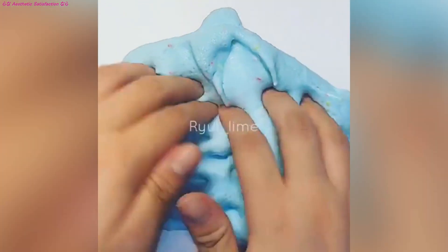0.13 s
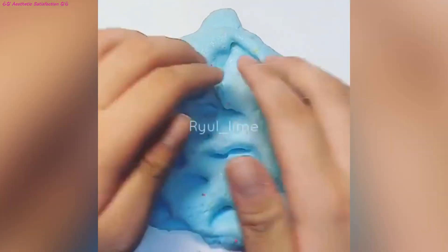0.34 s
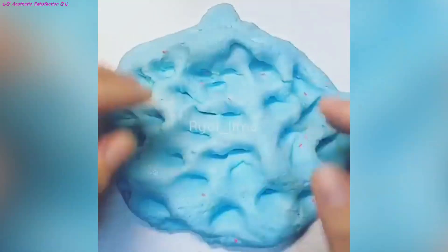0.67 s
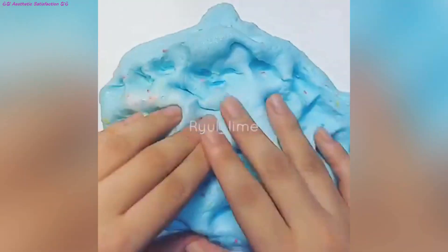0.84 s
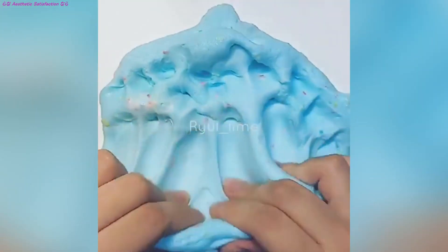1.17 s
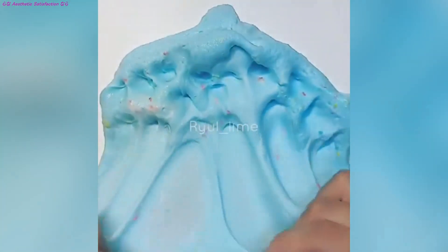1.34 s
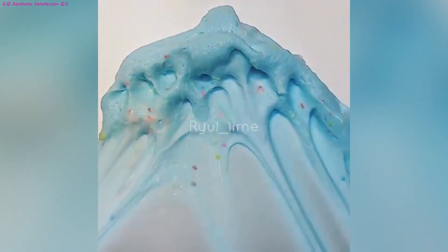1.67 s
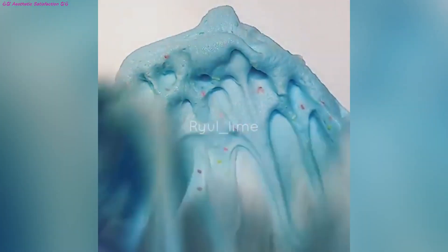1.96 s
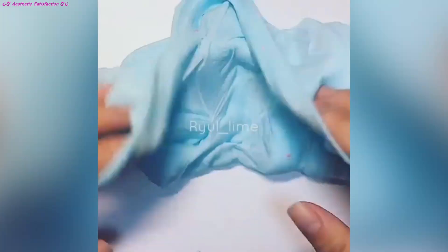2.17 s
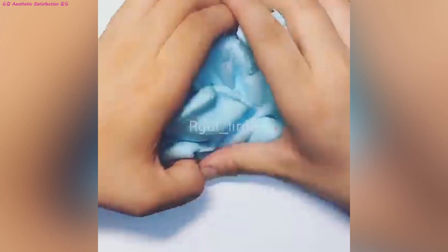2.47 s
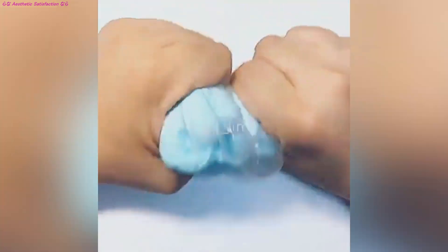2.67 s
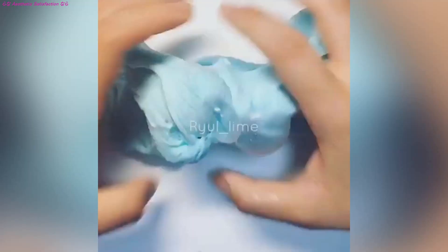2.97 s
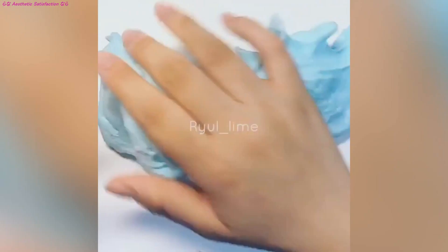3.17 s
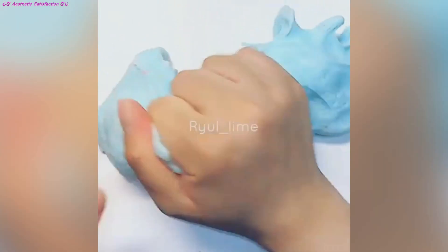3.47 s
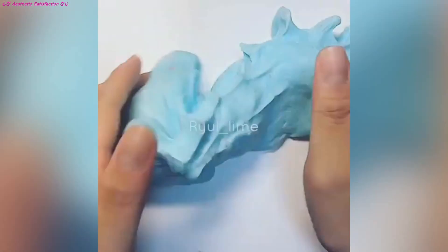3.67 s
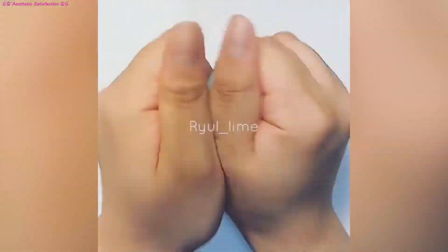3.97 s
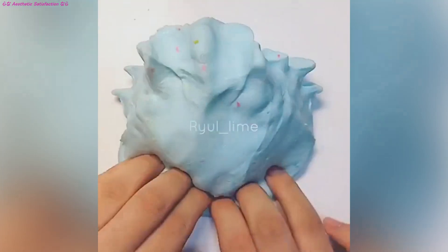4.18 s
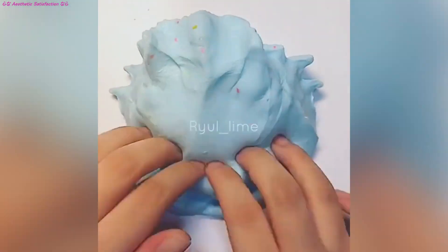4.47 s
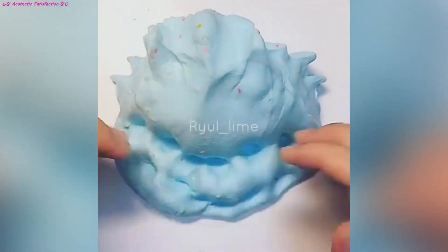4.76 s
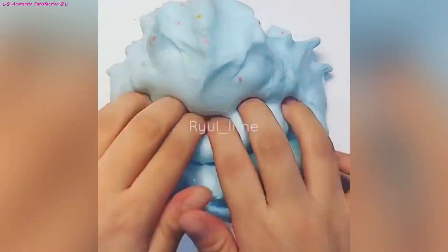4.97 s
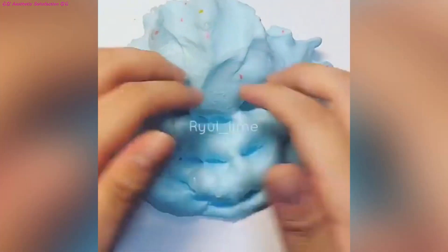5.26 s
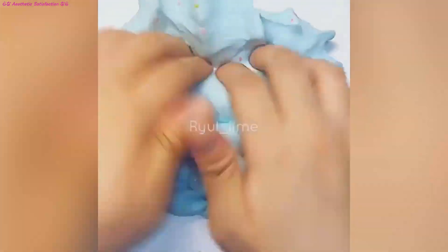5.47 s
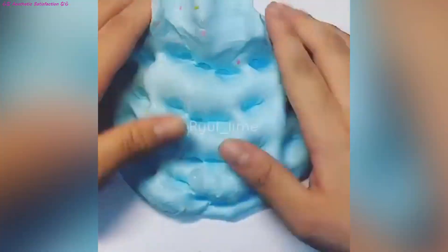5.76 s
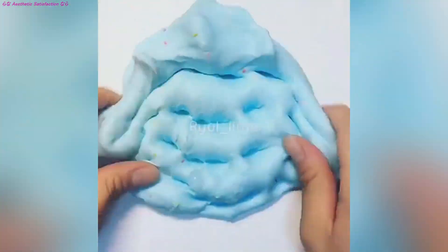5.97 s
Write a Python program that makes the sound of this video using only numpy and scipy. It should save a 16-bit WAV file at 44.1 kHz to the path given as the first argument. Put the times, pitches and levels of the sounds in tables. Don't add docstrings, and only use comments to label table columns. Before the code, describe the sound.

Hands knead thick slime up close: sharp wet pops, sticky crackling peels, a taut stretch, then dense squeezing bursts and soft table thumps.

```python
import sys
import numpy as np
from scipy import signal
from scipy.fft import rfft, irfft, next_fast_len
from scipy.io import wavfile
from scipy.ndimage import uniform_filter1d

SR = 44100
rng = np.random.default_rng(int(sys.argv[2]) if len(sys.argv) > 2 else 0)


def store_pcm(level_fs):
    pcm = np.round(np.clip(level_fs, -1, 1) * 32767).astype(np.int16)
    wavfile.write(sys.argv[1], SR, np.atleast_2d(pcm).T)


def level_to_linear(level):
    exponent = np.asarray(level, float) / 20
    return 10 ** exponent


N = 269451


def band(x, lo_hz, hi_hz, order=2):
    return signal.sosfilt(signal.butter(order, [lo_hz, hi_hz], "band", fs=SR, output="sos"), x)


def unit(x):
    return x / np.sqrt(np.mean(x ** 2))


def peaked(x):
    return x / np.abs(x).max(axis=-1, keepdims=True)


def walk(rate):
    k = int(SR / rate)
    held = np.repeat(rng.standard_normal(N // k + 1), k)
    return 1.3 * uniform_filter1d(uniform_filter1d(held, k), k)[:N]


def add(out, s, x):
    i = max(int(s * SR), 0)
    out[i:i + len(x)] += x[:N - i]


def room():
    # pitch_hz, level_db (per Hz)
    spectrum = np.array([(26, -33.5), (45, -2.5), (87, -7.5), (174, -10), (277, -11.5), (539, -18.5),
                         (609, -27), (948, -35), (1070, -29), (13500, -37), (16000, -55)])
    hz = np.maximum(np.fft.rfftfreq(N, 1 / SR), 1)
    colour = level_to_linear(np.interp(np.log(hz), np.log(spectrum[:, 0]), spectrum[:, 1]))
    noise = unit(irfft(rfft(rng.standard_normal(N)) * colour, N))
    return noise * level_to_linear(-66.5 - 6.5 + 0.32 * walk(2.4))


def strokes(wet):
    # peak_s, crackle_db, rise_ms and fall_ms (per 20 dB), wet_db (re crackle)
    touches = [(0.181, -67.5, 184, 137, -7.5), (0.528, -73, 8, 300, -9), (0.58, -67.5, 82, 122, -5),
               (1.023, -70, 125, 900, -5.5), (1.16, -70.5, 68, 502, -10), (1.357, -59.5, 132, 205, -6),
               (1.539, -60.5, 97, 66, -8), (1.62, -79.5, 100.5, 480, 1), (4.26, -75, 25, 302, -4),
               (4.65, -74.5, 122, 502, -5.5), (5.02, -76.5, 38, 1999.5, -5.5), (5.56, -74, 296, 900, 1),
               (5.795, -66, 18, 53, -6), (6.047, -58, 127, 202, -0.5)]
    # peak_s, crackle_db, rise_ms and fall_ms (per 20 dB), wet_db (re crackle)
    kneads = [(2.149, -68.5, 130, 298, 1), (2.27, -57, 201, 51, -4.5), (2.496, -68, 600, 100, -19),
              (2.595, -55.5, 125, 238, -3), (2.7, -55.5, 95, 200, -8), (2.768, -55.5, 57, 134, -21),
              (2.884, -55, 62.5, 107, 5), (2.984, -58, 32, 63, -24), (3.086, -46, 70.5, 76, -3),
              (3.147, -55, 123, 11, -10), (3.385, -64, 128, 62, -4), (3.444, -50, 35, 148, -12),
              (3.57, -49.5, 10, 39, -10), (3.644, -54, 31, 102, -3.5), (3.7, -49.5, 145, 13, -5.5),
              (3.986, -59, 350, 148, -6), (4.131, -60.5, 240, 92, -14), (4.21, -53.5, 200, 11, -3.5)]
    # let_go_s, loudest_s, crackle_db, wet_db (re crackle), fall_ms (per 20 dB)
    pulls = [
        (0.31, 0.363, -54, 5.5, 63),
        (0.704, 0.751, -53.5, 2, 50),
        (4.403, 4.436, -49, 1, 44),
        (4.821, 4.859, -49.5, 1, 42.5),
        (5.247, 5.305, -51, 0.5, 31.5),
        (5.65, 5.695, -54, 6.5, 74),
    ]
    t = np.arange(N) / SR
    power = level_to_linear(2 * -87)
    for s, db, rise_ms, fall_ms, wet_db in touches + kneads:
        distance = np.maximum((s - t) / rise_ms, (t - s) / fall_ms) * 1000
        power = power + level_to_linear(2 * (db + wet * wet_db - 20 * distance))
    let_go_ms = 6.8
    drip_db, drip_slower = -23, 1.7
    for go_s, s, db, wet_db, fall_ms in pulls:
        start_db = -8 + wet * -8
        rise = np.interp(t, [go_s - let_go_ms / 250, go_s, s], [start_db - 80, start_db, 0])
        after = np.maximum(t - s, 0) * 1000 / fall_ms
        fade = after / 1.19 if wet else after ** 1.27
        level_db = db + wet * wet_db + rise
        power = power + level_to_linear(2 * (level_db - 20 * fade))
        power = power + level_to_linear(2 * (level_db + drip_db - 20 * after / drip_slower))
    return 10 * np.log10(power)


def ticks(count=130):
    draw = np.clip(rng.standard_normal((count, 4)), -1.5, 1.5)
    s = rng.uniform(0, N / SR, count)
    db = strokes(0)[(s * SR).astype(int)] + 6 + 4.5 * draw[:, 0]
    hz = 2340 * np.exp(.5 * draw[:, 1])
    return np.transpose([s, db, hz, -10 + 5 * draw[:, 2], -8.5 + 5 * draw[:, 3]])


def pops():
    # start_s, peak_db, pitch_hz, body_db (re peak), snap_db (re peak)
    poke_pops = [(0.103, -66.5, 3000, -6, 14), (0.178, -64, 7050, -8, 18), (0.215, -62.5, 3000, -12, 13),
                 (0.269, -68, 8000, -8, 18), (0.2541, -62.5, 7850, -13, 12.5),
                 (0.3122, -41, 1720, -6, 10.5), (0.337, -26.5, 820, 1.5, -1.5), (0.357, -28.5, 653, 3, 8.5),
                 (0.3578, -23.5, 2070, -8, -17), (0.3616, -42, 557, 12, -1),
                 (0.7084, -38.5, 2170, -11, 6.5), (0.7246, -26.5, 4670, -6.5, 1),
                 (0.727, -36.5, 975, 6, -22), (0.744, -60, 8000, -10, 13), (0.7622, -45.5, 1010, 16, 11),
                 (0.961, -69, 7000, -9, 10), (1.0073, -62, 500, 8, 5), (1.0365, -50, 2820, -21, 6.5),
                 (1.1212, -39, 6040, -13, 9), (1.1459, -48, 2970, -1, 5), (1.1678, -48, 1960, -9, -17),
                 (1.3551, -43, 1650, -19, -10), (1.537, -47, 1880, -16, -19)]
    fold_pops = [(2.2255, -36.5, 1493, 1.5, -3), (2.2622, -28, 4160, -16, -2.5),
                 (2.4076, -55, 1330, 6.5, 6.5), (2.469, -47, 4100, -6, -1), (2.5174, -46.5, 430, 11, -12),
                 (2.5765, -19, 1900, -9.5, -26), (2.5882, -36, 1890, -26, -13),
                 (2.7537, -24, 3070, -13, -26.5), (2.772, -40.5, 1450, 7.5, 8),
                 (2.7911, -42, 1290, -4, 11.5), (2.8233, -36, 1520, 0.5, -7),
                 (2.8422, -31.5, 1460, -2, -7.5), (2.8669, -11, 2595, -5, -15),
                 (2.8658, -30, 2700, -3.5, 3), (2.894, -39, 950, -7, -13), (2.9241, -37, 756, -2, 3),
                 (2.9734, -29.5, 7400, -7, 13), (2.9895, -58, 8000, -10, 24), (3.0553, -36, 2090, 0.5, -7),
                 (3.17, -60.5, 664, 10, -12)]
    fist_pops = [(3.3877, -42.5, 1370, -5, 5), (3.4184, -40, 1340, 7, -23.5),
                 (3.4244, -23.5, 1120, -5, 1.5), (3.443, -30.5, 8700, -16, 8),
                 (3.447, -23.5, 1290, -5.5, -18), (3.4511, -21, 2830, -14, -0.5),
                 (3.4807, -40, 1580, -13, -18), (3.5019, -26, 2100, -4.5, -0.5),
                 (3.506, -23.5, 870, -9, 4.5), (3.5318, -43, 4780, -5, 3), (3.5561, -24, 4430, -11.5, 4),
                 (3.567, -37, 2540, -24, 11.5), (3.572, -36, 2110, -20, 4), (3.642, -36.5, 2000, 0, -17),
                 (3.735, -42, 1155, 1, -6)]
    palm_pops = [(3.9362, -38.5, 5830, -16, 10), (3.9437, -38, 950, -3.5, -11),
                 (3.9848, -40, 2910, -21, -1.5), (3.9932, -41, 2030, -9.5, 5.5),
                 (4.015, -36, 1880, -19, -1), (4.0353, -46.5, 3380, -24, -12), (4.0453, -41, 3920, -19, 5),
                 (4.05, -29, 2090, -28, -22), (4.0566, -36.5, 2630, -28, 1.5),
                 (4.083, -41.5, 8600, -17, 14.5), (4.108, -43, 3380, -22, 5.5),
                 (4.1251, -41, 2050, -12, -2), (4.1347, -38, 1640, -13.5, 12.5),
                 (4.1556, -41.5, 10000, 0, 17), (4.1699, -17, 2900, -16, 4), (4.1706, -26, 3200, -16, -22),
                 (4.188, -50.5, 8500, -7.5, 18), (4.1968, -53, 1200, -5.5, 16.5),
                 (4.2084, -43.5, 4360, -16, 1.5)]
    late_pops = [(4.3089, -57, 2000, -5, 5), (4.3935, -61, 8370, -6, 15), (4.402, -47, 7600, 0, 9),
                 (4.4254, -33.5, 2424, -4, 11), (4.632, -58.5, 5050, -2, 7), (4.6611, -50, 2060, -21, -6),
                 (4.7056, -44, 2970, -10, -3.5), (4.8203, -41.5, 7300, -7, 11.5),
                 (4.8458, -37, 2640, -2, -12), (4.8514, -37.5, 1310, 1, 5.5), (5.02, -57, 1527, 2.5, 0),
                 (5.044, -51.5, 2840, -2, -8), (5.118, -55, 600, 5.5, -3), (5.2521, -38.5, 8400, -2, 18),
                 (5.2717, -22.5, 2890, -8, -9.5), (5.2743, -44, 1050, 7, -12),
                 (5.574, -60.5, 9000, -9, 25.5), (5.654, -52, 880, 7, 19), (5.672, -26.5, 4370, -3.5, -3.5),
                 (5.6744, -37, 1150, 11, -17), (5.7, -35.5, 1120, -17, 1.5), (5.7236, -32, 1044, 6.5, -3),
                 (5.7895, -42, 3720, -9, 3), (5.794, -44, 3500, -16, -6), (5.865, -49.5, 496, 3.5, -4)]
    # start_s, gap_ms, share (signed size of the echo), top_db (treble)
    echoed_pops = [
        (0.357, 1.08, 0.24, 6),
        (0.7246, 1.38, .4, -16),
        (1.1212, 1.6, 0.028, -24),
        (2.8666, 1.09, 0.99, 6),
        (2.9734, 1.2, 0.13, 6),
        (3.444, 0.98, 0.53, 4),
        (4.1697, .5, -0.98, -22.5),
        (5.272, 1.04, 0.95, -1),
        (5.672, 1.13, 0.37, -24),
    ]
    t = np.arange(2560) / SR
    rows = np.vstack([poke_pops, fold_pops, fist_pops, palm_pops, late_pops, ticks()])
    s, db, hz, body_db, snap_db = rows.T[:, :, None]
    noise = rng.standard_normal((len(rows), 2, len(t)))

    tear_ms = 3.76 * level_to_linear(-0.09 * (db + 35) + 1.5 * noise[:, 1, :1])
    tear_s = np.clip(tear_ms - .8, .15, 8) * .8 / 1000
    burst = noise[:, 0] * (np.exp(-t / .00035) + level_to_linear(-6) * np.exp(-t / tear_s))
    burst[:, 0] += 2.5
    ring_cycles = 4
    pocket = level_to_linear(2) * np.sin(2 * np.pi * hz * t) * np.exp(-t * hz / ring_cycles * np.pi)

    low, high = hz <= 1500, hz > 6000
    body = peaked(band(burst, 620, 1750, order=3))
    body = peaked(body + band(pocket * low, 380, 4300))
    mid = peaked(band(burst, 1454, 3360, order=3))
    mid = peaked(mid + band(pocket * ~(low | high), 1000, 11000))
    snap = peaked(band(band(burst, 4500, 17000, order=3), 3000, 10000, order=1))
    snap = peaked(snap + band(pocket * high, 3000, 16000))
    sag = peaked(band(noise[:, 1], 990, 1400) * (1 - np.exp(-t / 0.00054)) * np.exp(-t / 0.014))

    twins = [np.abs(s[:, 0] - row[0]).argmin() for row in echoed_pops]
    treble_hz = 10200
    for k, (_, _, _, top_db) in zip(twins, echoed_pops):
        top = band(snap[k], treble_hz, 17000, order=4)
        snap[k] = band(snap[k], 2000, treble_hz, order=4) + level_to_linear(top_db) * top
    sound = level_to_linear(db) * (mid + level_to_linear(body_db) * (body + level_to_linear(-19.5) * sag) + level_to_linear(snap_db - 0.5) * snap)
    for k, (_, gap_ms, share, _) in zip(twins, echoed_pops):
        sound[k] += share * np.interp(t - gap_ms / 1000, t, sound[k], left=0)
    out = np.zeros(N)
    for at, x in zip(s[:, 0], sound):
        add(out, at, x)
    return out


def booms():
    # swell_top_s, peak_db, pitch_hz
    pushes = [(0.139, -66, 68), (0.384, -52.5, 71), (0.567, -63, 61), (0.79, -57.5, 61.5),
              (1.033, -57.5, 60), (2.296, -48, 77), (2.378, -45.5, 61), (2.452, -69, 58.7),
              (2.548, -67, 65), (2.638, -62.5, 65), (2.777, -62.5, 62.4), (2.897, -63.5, 69),
              (3.156, -56, 63.3), (3.413, -60, 66.6), (3.673, -72.5, 73), (3.773, -54, 67.3),
              (3.9, -49, 65.7), (4.467, -52, 64.8), (4.61, -59.5, 67), (4.917, -56.5, 61.8),
              (5.055, -68, 65), (5.326, -50, 62.3), (5.46, -62.5, 58.6), (5.718, -49, 61), (5.879, -61, 81)]
    # pitch_hz, level_db (re boom), decay_s
    modes = [
        (115, -10, 0.035),
        (154, -9.5, 0.05),
    ]
    out, t = np.zeros(N), np.arange(12000) / SR
    rise_s = 0.027
    swell = (t / rise_s) ** 0.93 * np.exp(0.99 * (1 - t / rise_s))
    for s, db, hz in pushes:
        tone = np.sin(2 * np.pi * hz * t)
        for mode_hz, mode_db, fall_s in modes:
            ring = np.sin(2 * np.pi * (mode_hz * t + rng.random()))
            tone = tone + level_to_linear(mode_db) * np.exp(-t / fall_s) * ring
        add(out, s - rise_s - .004, level_to_linear(db - 0.5) * swell * tone)
    return out


def blips():
    # start_s, peak_db, pitch_hz
    first_blips = [(0.169, -65, 1360), (0.577, -61, 2730), (0.745, -59, 2610), (1.014, -58.5, 1080),
                   (1.085, -61, 1810), (1.245, -64, 1890), (1.32, -57, 2310), (1.365, -54, 1240),
                   (1.531, -59, 1490), (2.146, -60, 988), (2.189, -54, 4500), (2.204, -53, 2100),
                   (2.29, -56, 1890), (2.547, -48, 1770), (2.588, -49, 1830), (2.601, -45, 1720),
                   (2.614, -46, 1550), (2.63, -55, 2740), (2.645, -59, 3450), (2.66, -56, 970),
                   (2.682, -55, 4870), (2.691, -61, 1380), (2.698, -52, 2170), (2.717, -58, 2150),
                   (2.725, -50, 1290), (2.774, -38.5, 1410), (2.787, -55, 3040), (2.8684, -21.5, 1021),
                   (2.882, -48, 3680), (2.893, -46, 2840), (2.906, -52, 1980), (2.939, -53, 1000),
                   (2.959, -59, 2050), (3.062, -45, 1420), (3.072, -43, 1090), (3.08, -59, 3030),
                   (3.089, -58, 3060), (3.097, -38.5, 1270), (3.107, -56, 3670), (3.118, -45.5, 750),
                   (3.134, -50, 1380)]
    # start_s, peak_db, pitch_hz
    last_blips = [(3.172, -61, 1980), (3.305, -55, 1275), (3.482, -46, 1590), (3.534, -58, 4760),
                  (3.586, -55, 2760), (3.658, -46, 1910), (3.668, -54, 3040), (3.681, -45, 1400),
                  (3.689, -49, 1420), (3.86, -50, 730), (3.92, -57, 1010), (3.975, -50, 2170),
                  (3.994, -56, 5190), (4.0525, -33.5, 2120), (4.111, -57, 2710), (4.159, -42, 3380),
                  (4.172, -25.5, 1400), (4.184, -46, 1500), (4.4275, -29.5, 1550), (4.446, -45, 4600),
                  (4.201, -55, 2730), (4.209, -51, 4350), (4.244, -69, 1530), (4.404, -60, 2690),
                  (4.412, -54.5, 1490), (4.448, -42, 2730), (4.46, -48, 1100), (4.73, -60, 1380),
                  (4.824, -47, 580), (4.834, -45.5, 580), (4.846, -45, 2700), (4.855, -47, 776),
                  (4.865, -52, 2650), (4.878, -42.5, 1380), (4.886, -52, 4330), (5.2768, -29.5, 1050),
                  (5.316, -57.5, 2170), (5.521, -64.5, 2730), (5.653, -60, 2610), (5.704, -40, 1170),
                  (5.739, -46, 1450), (5.967, -60, 2090), (6.015, -55, 3000), (6.045, -54, 2910),
                  (6.057, -58, 2800), (6.065, -60, 3570), (6.083, -46, 1130)]
    # start_s, peak_db, pitch_hz
    fold_gulps = [(0.341, -48, 540), (0.342, -47, 190.4), (0.975, -64, 190), (1.016, -56, 368),
                  (1.139, -57, 320), (1.478, -58, 365), (2.231, -61, 317), (2.521, -43.5, 344),
                  (2.608, -50, 343), (2.632, -53, 130), (2.777, -44, 392), (2.873, -35.5, 500),
                  (3.455, -37, 393), (3.509, -47.5, 415), (3.645, -48.5, 282), (3.702, -57.5, 298),
                  (3.74, -51.5, 516), (3.862, -56.5, 450), (3.947, -63, 503), (4.174, -45.5, 456),
                  (4.433, -43, 449), (4.497, -57, 337), (4.84, -45.5, 220), (4.862, -46.5, 430),
                  (5.283, -50.5, 220), (5.32, -60, 130), (5.722, -46.5, 190), (6.017, -59.5, 428),
                  (6.059, -54, 390), (6.078, -59, 240)]
    # start_s, peak_db, pitch_hz
    rings = [
        (0.374, -41, 750),
        (0.397, -51.5, 810),
        (1.29, -63, 303),
        (1.43, -55, 274),
        (2.872, -33, 970),
        (2.89, -45.5, 866),
        (2.915, -48, 947),
        (5.74, -47, 1093),
    ]
    out = np.zeros(N)
    glide = 0.046
    small = (first_blips + last_blips, 0.3, 2.103)
    large = (fold_gulps + rings, 0, 6.37)
    for rows, trim_db, ms in (small, large):
        u = np.arange(int(8 * ms * SR / 1000)) / SR * 1000 / ms
        envelope = 1.6 * (1 - np.exp(-4 * u)) * np.exp(-u / 1.3)
        for (s, db, hz), turn in zip(rows, rng.random(len(rows))):
            phase = hz * ms / 1000 * (u + glide * (u - 1.5) ** 2 / 2) + turn
            add(out, s - ms / 1000, level_to_linear(db + trim_db) * envelope * np.sin(2 * np.pi * phase))
    return out


def crackle(per_s, scatter_db, smear_s):
    when = rng.random(N) < per_s / SR
    size = when * level_to_linear(scatter_db * rng.exponential(size=N))
    puffs = signal.lfilter([1], [1, -np.exp(-1 / (smear_s * SR))], size)
    return unit(puffs * rng.standard_normal(N))


def gurgle(lo_hz, hi_hz, per_s, cycles, count=7):
    out = np.zeros(N)
    for hz in np.geomspace(lo_hz, hi_hz, count):
        when = rng.random(N) < per_s / count / SR
        kicks = when * level_to_linear(1.2 * rng.exponential(size=N)) * rng.uniform(-1, 1, N)
        pole = np.exp(-np.pi * hz / cycles / SR)
        feedback = [1, -2 * pole * np.cos(2 * np.pi * hz / SR), pole ** 2]
        ringing = unit(signal.lfilter([1, 0, -1], feedback, kicks))
        out += level_to_linear(3.5 * walk(45)) * ringing
    return unit(band(out, .7 * lo_hz, 1.4 * hi_hz))


def peel():
    db = strokes(0)
    body_db = strokes(1) - db
    fizz_db = -2 - 0.1017 * np.maximum(db + 67.5, 0)
    lead_ms = 8
    fizz_db += np.clip(lead_ms * np.gradient(uniform_filter1d(db, size=600)) * SR / 1000, -8, 4)

    fine = crackle(per_s=2500, scatter_db=3.3, smear_s=.001)
    finer = crackle(per_s=3500, scatter_db=3.1, smear_s=.0007)
    hollows = gurgle(1300, 3600, per_s=1300, cycles=11)
    mid = unit(unit(band(fine, 1600, 5500)) + 1.4 * hollows) * level_to_linear(1.2 * walk(40))
    wet = gurgle(600, 1250, per_s=1400, cycles=4.5, count=5)
    body = unit(wet + .5 * unit(band(fine, 200, 500))) * level_to_linear(0.5 * walk(44))
    fizz = unit(band(finer, 5000, 12500)) * level_to_linear(1.0 * walk(30))
    slosh = gurgle(140, 400, per_s=220, cycles=1.5, count=3) * level_to_linear(-72 + .5 * (db + body_db + 64.5))
    skin = mid + level_to_linear(body_db) * body + level_to_linear(fizz_db) * fizz
    return level_to_linear(db + .8 * walk(20)) * skin + slosh


def knocks():
    # start_s, peak_db, pitch_hz
    slaps = [(0.336, -45.5, 443), (0.711, -47, 357), (0.769, -55, 190), (1.008, -48.5, 260),
             (4.822, -46, 320), (2.139, -57, 155), (2.263, -45, 188), (2.301, -43, 158), (2.325, -36, 184),
             (2.3444, -32.5, 214), (2.37, -46.5, 125), (2.433, -49.5, 128), (2.515, -43.5, 335),
             (3.427, -43, 430), (2.767, -46, 397), (3.111, -55.5, 156), (3.171, -55.5, 191),
             (3.453, -41, 427), (3.636, -48, 280), (3.731, -48.5, 97.5), (3.858, -46, 205),
             (4.045, -55.5, 336), (3.506, -45.5, 417), (4.427, -36.5, 384), (4.854, -39, 420),
             (5.115, -60.5, 433), (5.276, -41, 450), (5.253, -51, 322), (5.854, -47.5, 185)]
    out, t = np.zeros(N), np.arange(2048) / SR
    for s, db, hz in slaps:
        turns = hz * t - 1
        push = np.sin(2 * np.pi * turns) * np.exp(-(turns / 0.44) ** 2)
        weight = np.sin(np.pi * turns) * np.exp(-(turns / 0.71) ** 2)
        wobble = peaked(band(rng.standard_normal(len(t)), 110, 1.15 * hz) * np.exp(-t / 0.03))
        early_s = 0.868 / hz + .001
        add(out, s - early_s, level_to_linear(db + 2.5) * (push + 0.28 * weight + 0.29 * wobble))
    return out


def sheet():
    # start_s, taut_s, slack_s, end_s
    tension_s = [1.1, 1.2, 1.58, 1.7]
    taut = np.interp(np.arange(N) / SR, tension_s, [0, 1, 1, 0])
    return taut * level_to_linear(strokes(0) - 3.5) * gurgle(1500, 2330, per_s=2400, cycles=5, count=4)


def late_bass(x):
    size = next_fast_len(N + SR)
    hz = np.clip(np.fft.rfftfreq(size, 1 / SR), 25, None)
    lag_cycles, top_hz = 1.7, 750
    lag_s = lag_cycles / hz / (1 + (hz / top_hz) ** 2)
    phase = 2 * np.pi * np.cumsum(lag_s) * SR / size
    return irfft(rfft(x, size) * np.exp(-1j * phase), size)[:N]


def scene():
    struck = late_bass(pops() + peel() + knocks())
    return (struck + blips() + booms() + room() + sheet())[None]


def low_pass(x):
    return signal.sosfilt(signal.butter(12, 16850, fs=SR, output="sos"), x)


def record(dry):
    x = signal.sosfilt(signal.butter(4, 47, "high", fs=SR, output="sos"), dry)
    x = signal.sosfilt(signal.ellip(8, .2, 70, 16300, fs=SR, output="sos"), x)
    low = signal.sosfiltfilt(signal.ellip(8, .1, 60, 14000, fs=SR, output="sos"), x)
    return low_pass(low + level_to_linear(-15) * (x - low))


dry = scene()
out = record(dry)
store_pcm(out)
```